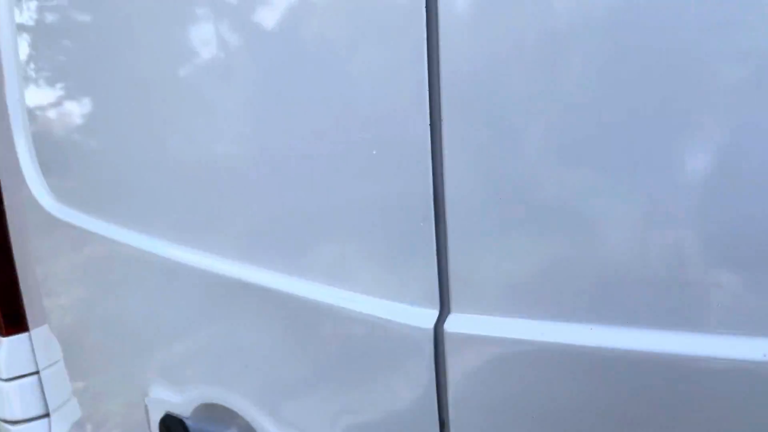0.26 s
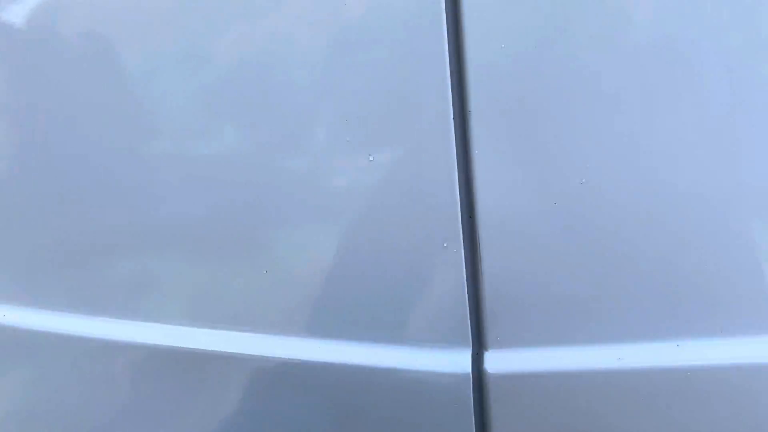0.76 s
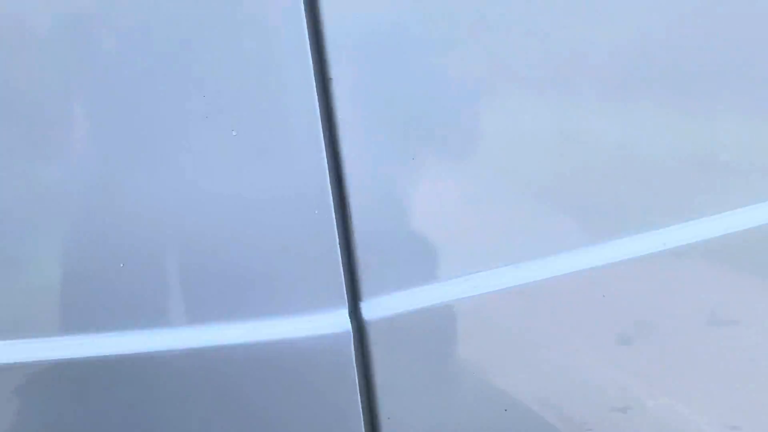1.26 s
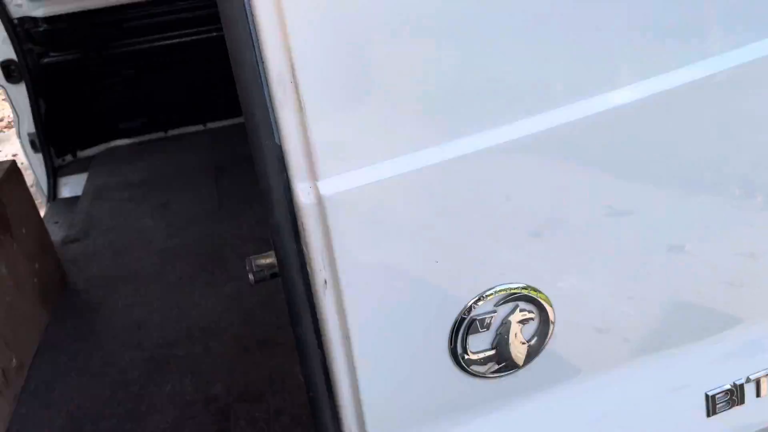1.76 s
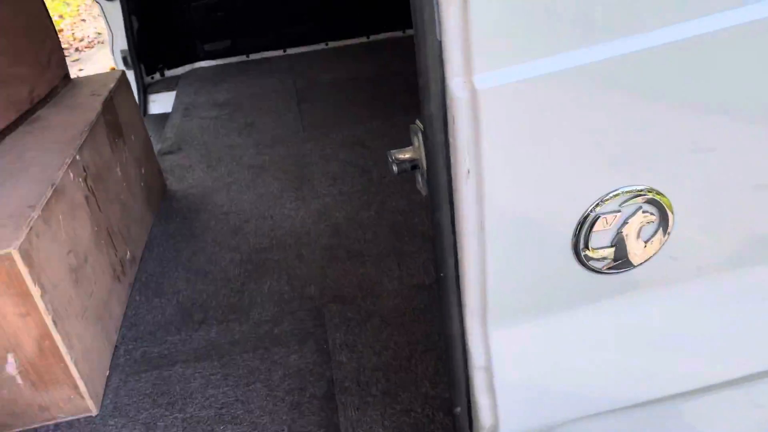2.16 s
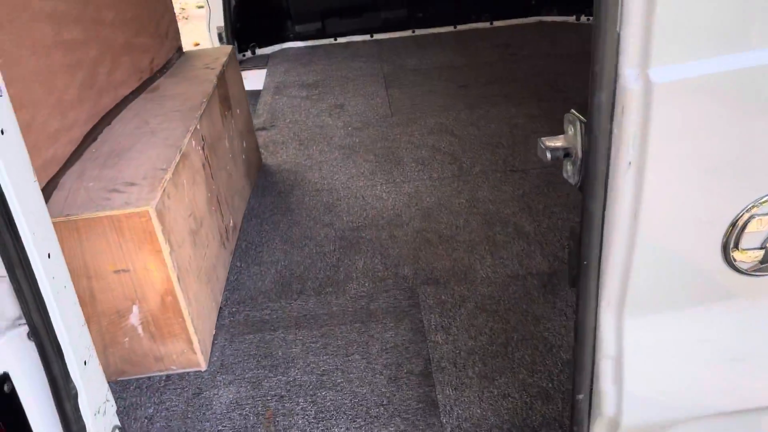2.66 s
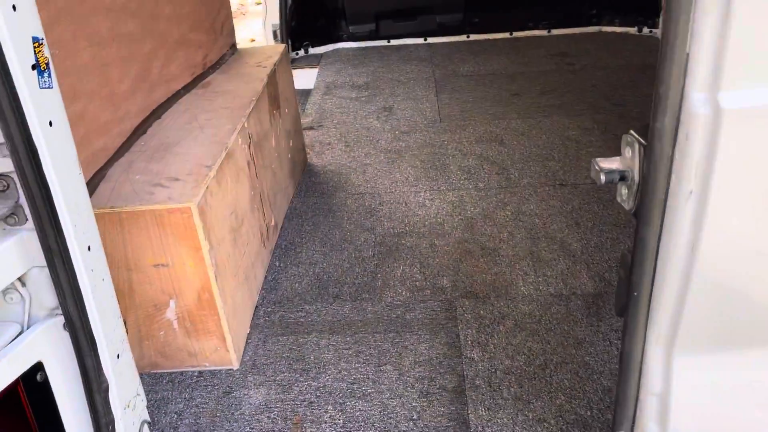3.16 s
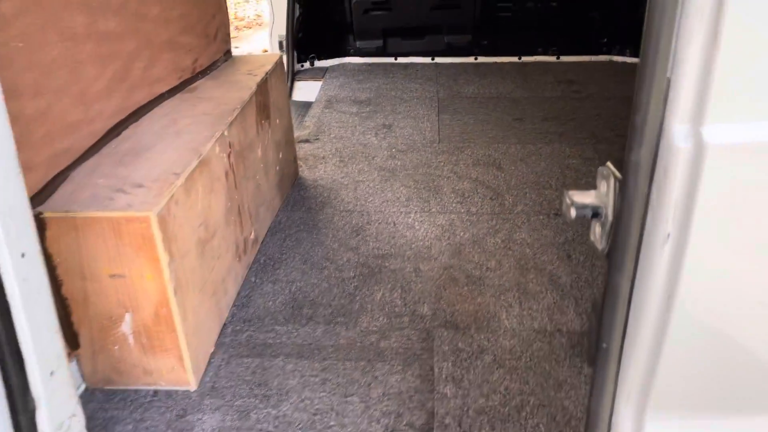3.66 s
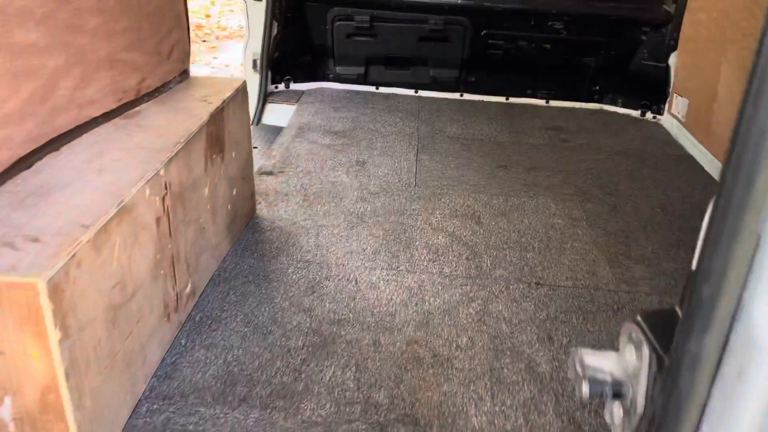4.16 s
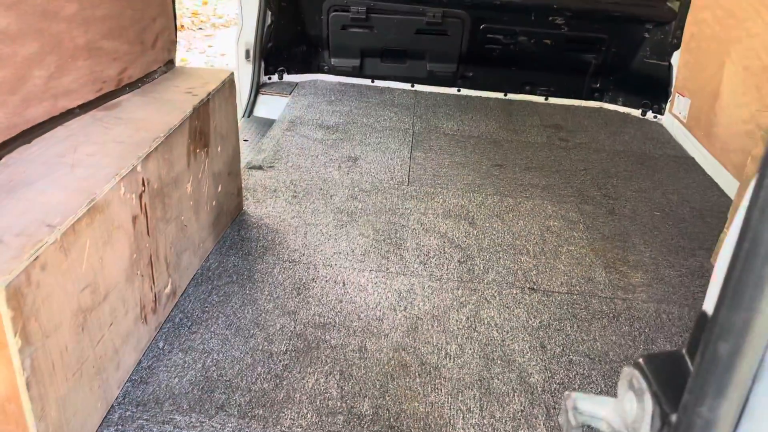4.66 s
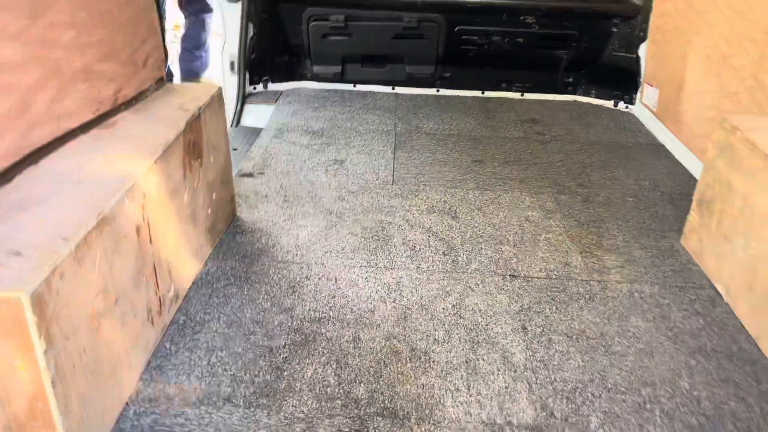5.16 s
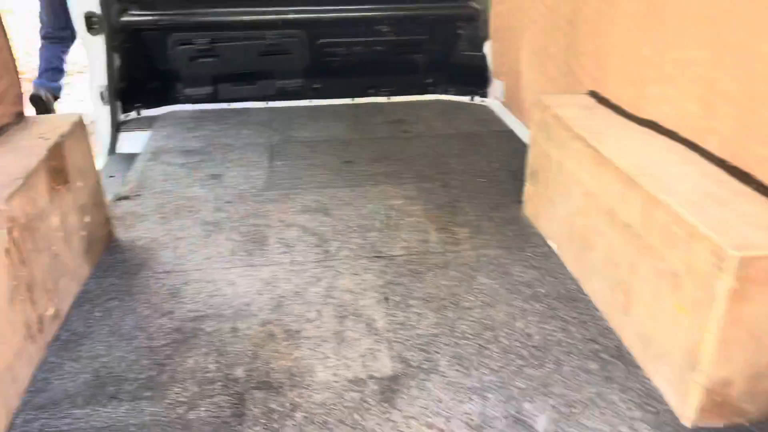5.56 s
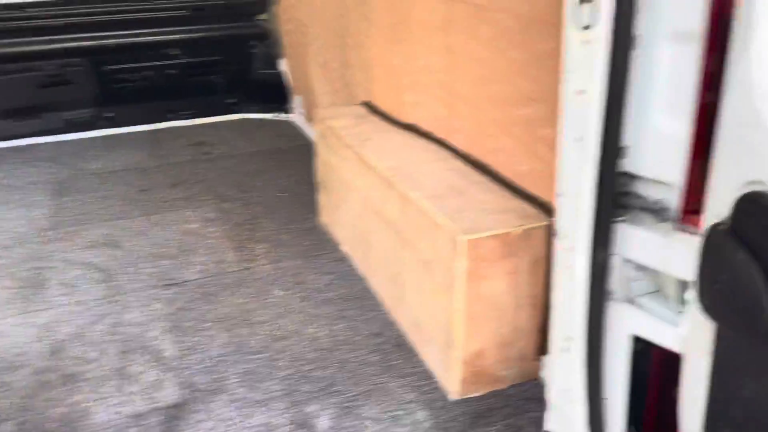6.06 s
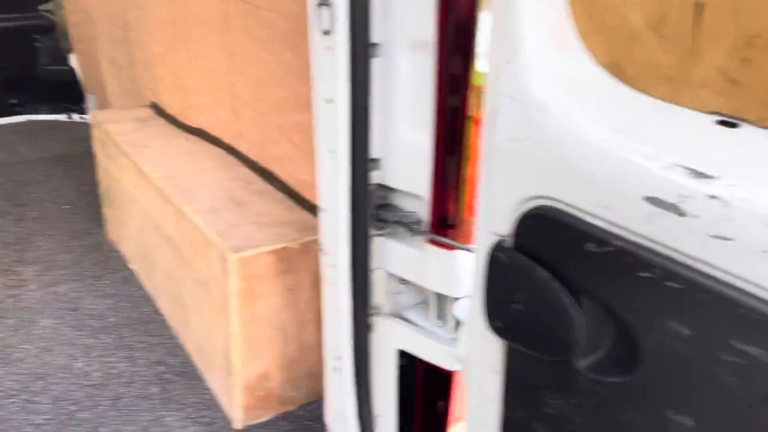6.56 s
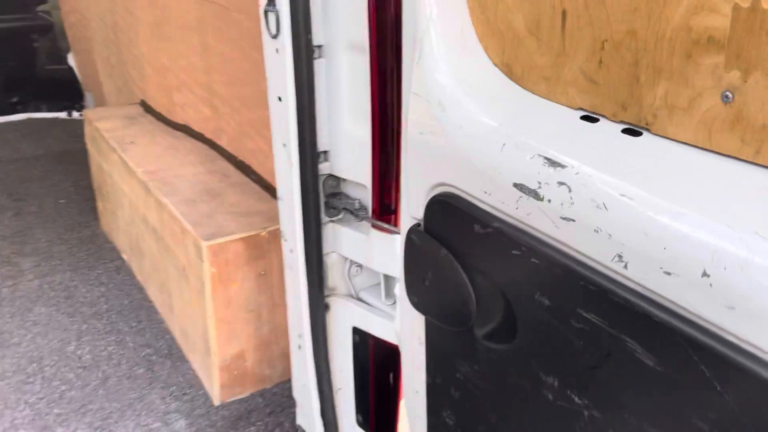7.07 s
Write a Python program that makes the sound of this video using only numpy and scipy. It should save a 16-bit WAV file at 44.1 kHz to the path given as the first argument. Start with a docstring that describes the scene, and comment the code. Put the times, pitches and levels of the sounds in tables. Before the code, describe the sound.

Outdoors, close to a phone microphone, a van's rear door is unlatched with a soft knock and a heavy clunk. Its hinges drag, making the metal panel rumble and hum until the door stay clacks. The second door then unlatches with a sharp metallic clack, swings with a quieter rumble and a brief scrape, and ends with more clunks. Faint rustling of clothes and grass and distant road traffic continue underneath.

```python
"""Outdoors, an arm's length from a phone: a van's two metal rear doors are unlatched and swung open in turn.
Latches and door stays clack and scrape; thumps boom in the sheet-metal panels. The hinges drag, and their
slips make the panels rumble and hum. Clothes and grass rustle nearby over distant road traffic."""
import sys
import numpy as np
from scipy import signal
from scipy.fft import rfft, irfft, next_fast_len
from scipy.io import wavfile
from scipy.ndimage import uniform_filter1d

SR = 44100
rng = np.random.default_rng(int(sys.argv[2]) if len(sys.argv) > 2 else 0)


def dump_mix(stems):
    """Bounce the given channels to the path in sys.argv[1] as a 16-bit WAV at rate SR."""
    frames = np.atleast_2d(stems).T  # one column per channel
    limited = np.clip(frames, -1, 1)  # hard clip at full scale
    pcm = np.round(limited * 32767).astype(np.int16)
    wavfile.write(sys.argv[1], SR, pcm)


N = 322856
T = np.arange(N) / SR

# panel modes: (pitch [Hz], width [Hz], struck [dB], first door turning [dB], second door turning [dB])
PANEL_MODES = [(37.6, 23, -10, -24, -19), (59.4, 8.3, -0.5, -4, -21), (73.9, 8.5, -3, -6, -12),
               (94.1, 23, -1, -1.5, 0), (114, 19.6, -9.5, 0.5, -4), (125.5, 27, -2, -0.5, -8),
               (157.1, 19.8, 4.5, 3, 4), (184.7, 15.2, -0.5, 1.5, 3), (213.9, 19, -1.5, -0.5, 0),
               (240.7, 13.1, -1.5, -2, -5), (270.8, 16.7, 5, -3, 2.5), (308.9, 15.6, -3, -7.5, -5.5),
               (359, 15.5, 1, -9, -19), (422.7, 32, 4.5, -14, -22), (490, 23, -7, -17, -27)]
# upper panel modes: (pitch [Hz], width [Hz], level [dB])
UPPER_MODES = [(453.4, 76, 12.5), (547, 95, 4), (647.5, 30, 3.5), (754, 110, 8), (891, 31, -3.5),
               (1100, 68, -13)]


def undb(db):
    return 10 ** (np.asarray(db) / 20)


def unit_rms(x):
    return x / np.sqrt(np.mean(x ** 2))


def over_time(table):
    """Columns of a (time [s], ...) table at every sample."""
    times_s, *columns = np.transpose(table)
    return [np.interp(T, times_s, column) for column in columns]


def on_log_hz(table, hz):
    """Columns of a (frequency [Hz], ...) table at hz."""
    knots_hz, *columns = np.transpose(table)
    return [np.interp(np.log(hz), np.log(knots_hz), column) for column in columns]


def band(x, hz, width_hz):
    """Resonance, unity gain at the centre."""
    return signal.lfilter(*signal.iirpeak(hz, hz / width_hz, SR), x)


def wobble(rate_hz):
    """Random steps, smoothed twice; rms 1."""
    hold = int(SR / rate_hz)
    steps = np.repeat(rng.standard_normal(N // hold + 1), hold)
    return unit_rms(uniform_filter1d(uniform_filter1d(steps, hold), hold)[:N])


def band_noise(hz, width_hz):
    """Steep noise band, rms 1; rows: direct, scattered."""
    return unit_rms(band(band(rng.standard_normal((2, N)), hz, width_hz), hz, width_hz))


def quadrature(tone):
    """Direct and scattered rows of a complex tone, a quarter cycle apart."""
    return np.array([tone.imag, tone.real])


def retune(hz, blow_hz, detune):
    """Parts sit differently at each blow: the nearest mode takes its pitch, the rest stray."""
    nearest = np.argmin(abs(np.log(hz / blow_hz)))
    return np.where(hz == hz[nearest], blow_hz, hz * (1 + detune))


def add(out, start_s, piece):
    start = int(start_s * SR)
    out[..., start:start + piece.shape[-1]] += piece[..., :N - start]


def wavering_noise(spectrum, flicker_db):
    """Half-octave bands, each wavering alone; rms 1."""
    low_hz, high_hz = spectrum[0][0], spectrum[-1][0]
    out = 0
    for hz in low_hz * 2 ** np.arange(0, np.log2(high_hz / low_hz), 0.5):
        density_db = on_log_hz(spectrum, hz)[0] + flicker_db * wobble(5)
        out += undb(density_db) * np.sqrt(hz) * band_noise(hz, 0.5 * hz)
    return unit_rms(out)


def traffic():
    """Distant road: engines rumble, tyres give a steadier roar near 1 kHz."""
    # (time [s], rumble [dB], roar [dB])
    levels = [(0.0, -36, -36.5), (1.14, -37, -40), (1.9, -35, -40), (3.79, -38.5, -40.5), (5.6, -36, -39.5),
              (7.32, -36.5, -38)]
    # spectra: (frequency [Hz], density [dB])
    engine_spectrum = [(25, -35), (40, -1), (62, 2), (100, -3), (160, -12), (260, -17.5), (420, -29)]
    tyre_spectrum = [(250, 2), (450, -7.5), (850, 7.5), (1300, 1), (2200, -3), (3300, -21), (5500, -38.5),
                     (9000, -58.5), (15000, -37)]
    rumble_db, roar_db = over_time(levels)
    roar = wavering_noise(tyre_spectrum, flicker_db=1.3)
    rumble = wavering_noise(engine_spectrum, flicker_db=2.4)
    return undb(rumble_db + 2.5) * rumble + undb(roar_db - 4.5) * roar


def rustle(rest_mid_db=-66.5, rest_treble_db=-78.0, flicker_db=2, grain_db=1.0):
    """Cloth and grass: grainy hiss, its bands flickering partly together; swishes rise out of it."""
    # (peak time [s], rise [s], fall [s], mid near 5 kHz [dB], treble near 11 kHz [dB])
    swishes = [(0.184, 0.15, 0.48, -62.5, -66), (0.82, 0.2, 0.36, -56, -60), (1.62, 0.2, 0.49, -52, -67),
               (2.11, 0.032, 0.24, -53.5, -80), (2.38, 0.16, 0.038, -54, -61), (2.62, 0.17, 0.41, -60, -81),
               (3.6, 0.14, 0.27, -71, -62.5), (3.73, 0.11, 0.089, -58, -63), (4.15, 0.14, 0.99, -73, -71.5),
               (4.62, 0.24, 0.12, -61, -58.5), (5.12, 0.15, 0.58, -64, -66.5),
               (5.44, 0.44, 0.066, -59, -71), (5.87, 0.17, 0.38, -49, -51.5), (5.95, 0.2, 0.21, -42.5, -48),
               (6.054, 0.55, 0.025, -43.5, -58), (6.17, 0.068, 0.62, -57, -84),
               (6.64, 0.26, 0.057, -55, -79), (7.04, 0.58, 0.94, -55, -71)]
    # (centre [Hz], level [dB], share that follows the treble [0-1])
    hiss_bands = [(1600, 0, 0), (2370, 1.5, 0), (3260, -3.5, 0.02), (4600, -1.5, 0.15), (6230, 0.5, 0.52),
                  (9400, 2.5, 0.93), (11200, -2.5, .99), (14500, -4.5, 0.86)]
    mid_db, treble_db = rest_mid_db, rest_treble_db
    for peak_s, rise_s, fall_s, peak_mid_db, peak_treble_db in swishes:
        times_s = [peak_s - rise_s, peak_s, peak_s + fall_s]
        mid_db = np.maximum(mid_db, np.interp(T, times_s, [rest_mid_db, peak_mid_db, rest_mid_db]))
        swish_treble_db = np.interp(T, times_s, [rest_treble_db, peak_treble_db, rest_treble_db])
        treble_db = np.maximum(treble_db, swish_treble_db)
    out, common_db = 0, grain_db * wobble(62)
    for hz, colour_db, treble_share in hiss_bands:
        db = mid_db + treble_share * (treble_db - mid_db) + colour_db
        out += undb(db + common_db + flicker_db * wobble(20)) * band_noise(hz, 0.5 * hz)
    return out


def panel_thumps(falloff_db_per_oct=16, nearest_db=5, rise_cycles=0.33):
    """Each blow rings the panel modes, most those near the pitch of the struck spot."""
    # (time [s], peak [dB], spot pitch [Hz], t60 of the nearest mode [s])
    blows = [(0.39, -14.5, 321, 0.12), (0.413, -15.5, 187.6, 0.21), (0.425, -13, 59.4, 0.54),
             (0.47, -21.5, 58, 0.29), (0.51, -17, 215.4, 0.17), (0.544, -20, 63, 0.14),
             (1.2357, -1, 333.7, 0.097), (1.236, -11, 68.4, 0.26), (1.239, -17, 247, 0.11),
             (1.243, -14.5, 42, 0.53), (1.246, 0.5, 172.5, 0.079), (1.264, -16.5, 161, 0.13),
             (1.297, -7.5, 164.5, 0.15), (1.326, -11, 210, 0.08), (1.65, -9, 270, 0.069),
             (1.702, -13, 237, 0.11), (2.16, -27.5, 579, 0.48), (2.16, -29, 494, 0.3),
             (1.69, -31, 650, 0.14), (2.191, -15, 206.5, 0.4), (2.524, -11, 184, 0.22),
             (2.671, -11.5, 330, 0.17), (2.674, -13, 94.7, 0.32), (2.677, -4, 237, 0.12),
             (2.749, -22, 137, 0.16), (4.083, -33, 666, 0.14), (4.161, -27.5, 71, 0.33),
             (4.203, -21, 55, 0.83), (4.207, -20, 301, 0.045), (4.264, -18, 199.6, 0.11),
             (4.371, -34.5, 220, 0.15), (4.709, -16, 392.5, 0.23), (4.714, -16.5, 91, 0.18),
             (4.734, -14, 78.8, 0.22), (4.737, -21.5, 260.5, 0.28), (4.769, -18, 89.8, 0.52),
             (4.752, -32, 634, 0.12), (5.106, -28, 67, 0.19), (5.934, -27.5, 643, 0.24),
             (6.454, -15, 362, 0.17), (6.467, -14, 268, 0.16), (6.475, -22.5, 635, 0.11),
             (6.483, -6.5, 328, 0.11), (6.49, -11, 98, 0.15), (6.503, -8, 270, 0.1),
             (6.508, -7.5, 175, 0.13), (6.515, -10, 119.6, 0.13), (6.5, -17, 43.8, 0.84),
             (6.539, -16.5, 280, 0.36), (6.599, -17.5, 283.4, 0.097)]
    modes = [mode[:3] for mode in PANEL_MODES]
    modes += [(hz, width_hz, db - 4) for hz, width_hz, db in UPPER_MODES[1:4]]
    hz, width_hz, mode_db = np.transpose(modes)[:, :, None]
    t, out = T[:SR // 2], np.zeros((2, N))
    draws = rng.uniform(-1.36, 1, (len(blows), 2, len(hz), 1))
    for (start_s, db, spot_hz, t60_s), (detune, phase) in zip(blows, draws):
        tuned_hz = retune(hz, spot_hz, 0.044 * detune)
        nearest = tuned_hz == spot_hz
        gain_db = np.where(nearest, nearest_db, mode_db - falloff_db_per_oct * abs(np.log2(tuned_hz / spot_hz)))
        damping = np.where(nearest, 1, np.sqrt(width_hz / 14))  # broad modes die sooner
        onset = 1 - np.exp(-t * hz / rise_cycles)
        envelope = onset * undb(gain_db - 60 * damping * t / max(t60_s, 0.02))
        ring = np.sum(envelope * np.exp(2j * np.pi * tuned_hz * t + 0.8j * phase), axis=0)
        add(out, start_s, undb(db) * quadrature(ring) / np.max(abs(ring.imag)))
    return out


def crack_and_rattle(blows, crack_t60_s=0.0081, crack_db=4, focus_db=5):
    """Noise of each blow: a short crack, then a rattling tail that dies sooner in the treble."""
    t, out = T[:SR // 3], 0
    for hz in 500 * 2 ** np.arange(0, 5.1, 0.5):
        envelope = np.zeros(N)
        for start_s, db, pitch_hz, body_db, treble_db, t60_s, rise_s in blows:
            spectrum = [(500, body_db - 3.5), (900, body_db), (3000, -9.5),
                        (6500, -6.5 + 0.28 * treble_db), (11000, treble_db), (16000, treble_db - 12)]
            colour_db, = on_log_hz(spectrum, hz)
            colour_db += focus_db * np.exp(-np.log2(hz / pitch_hz) ** 2 / 0.012)
            crack = undb(crack_db - 60 * t / (crack_t60_s + 6 * rise_s))
            tail_db = -3 - 0.0774 * db - 14 * (hz / 16000) ** 4  # soft blows: larger share of tail
            tail = undb(tail_db - 60 * t / t60_s * (hz / 3000) ** 0.38)
            onset = 1 - np.exp(-t / max(rise_s, 1 / hz))
            add(envelope, start_s, undb(db + colour_db) * onset * (crack + tail))
        out += envelope * band_noise(hz, min(0.63 * hz, 5000))
    return out


def steel_ring(blows, falloff_db_per_oct=18, nearest_db=5, scatter_db=3, damping=1.03):
    """Each blow lands elsewhere on the latch and rings its own mix of modes, most those near its pitch."""
    # (pitch [Hz], t60 [s], level [dB])
    latch_modes = [(1260, 0.093, 7), (1600, 0.056, 8), (1756, 0.025, 12), (2007, 0.036, 6),
                   (2417, 0.039, 7.5), (2734, 0.1, 0.5), (3050, 0.043, -2.5), (3205, 0.029, 6),
                   (3490, 0.06, 1), (3770, 0.034, 4), (4080, 0.034, 1), (4640, 0.023, 7.5),
                   (5320, 0.041, 0), (6200, 0.033, -7), (7250, 0.02, -12), (7200, 0.043, -9.5)]
    hz, mode_t60_s, mode_db = np.transpose(latch_modes)[:, :, None]
    t, out = T[:SR // 8], np.zeros((2, N))
    draws = rng.uniform(-0.94, 1, (len(blows), 3, len(hz), 1))
    for (start_s, db, pitch_hz, body_db, _, t60_s, rise_s), (size, detune, phase) in zip(blows, draws):
        tuned_hz = retune(hz, pitch_hz, 0.047 * detune)
        gain_db = mode_db + nearest_db * (tuned_hz == pitch_hz) + scatter_db * size
        gain_db -= falloff_db_per_oct * abs(np.log2(tuned_hz / pitch_hz))
        onset = 1 - np.exp(-t / rise_s)
        envelope = onset * undb(gain_db - 60 * damping * t / np.minimum(mode_t60_s, t60_s))
        ring = np.sum(envelope * np.exp(2j * np.pi * (tuned_hz * t + phase)), axis=0)
        ring_db = 1.3 * db + 0.0331 * body_db  # harder, fuller blows ring more
        add(out, start_s, undb(ring_db) * quadrature(ring) / np.max(abs(ring)))
    return out


def latches_and_stays(full_clack_rise_s=0.000089, scrape_rise_s=0.0082):
    """Latches and stays clack, weak blows rising more slowly; a stay scrapes over its catch."""
    # (time [s], level [dB], strongest pitch [Hz], body near 900 Hz [dB], treble [dB], t60 at 3 kHz [s])
    clacks = [(0.391, -51.5, 2030, 30, -25, 0.21), (0.8063, -29, 2110, -17, -6, 0.086),
              (0.834, -34, 1510, -6, -3, 0.067), (1.087, -36, 5100, -20, -4, 0.013),
              (1.2303, -31, 4660, -17, -12, 0.025), (1.2346, -16.5, 1910, 4, -6.5, 0.05),
              (1.239, -27, 1250, 11, -5, 0.25), (1.288, -34, 2400, -16, -17, 0.7),
              (1.541, -34, 2690, 2, -30, 0.77), (1.702, -26.5, 2020, -11, -24, 0.18),
              (1.786, -19.5, 2144, -12.5, -13, 0.37), (2.106, -30, 2370, 3, -22, 0.12),
              (2.3016, -24.5, 2610, 3, -5, 0.17), (2.524, -36, 2280, 7.5, -13, 0.58),
              (2.549, -32.5, 2480, -15, -9, 0.3), (2.622, -19.5, 3200, 0, 2.5, 0.11),
              (2.661, -10.5, 2390, -9.5, -9, 0.23), (2.663, -16, 5400, -22, -6, 0.062),
              (2.663, -11, 3830, -20, -27, 0.07), (2.666, -18, 1270, 14, -32, 0.078),
              (2.9384, -35.5, 3010, 10.5, -45, 0.041), (3.2939, -24.5, 2730, -15, -30, 0.18),
              (3.734, -28.5, 3450, -28, -9, 0.097), (4.0835, -40.5, 2160, 13, -2, 0.26),
              (4.264, -41, 2860, -22, -5, 0.89), (4.329, -41, 2200, -13, -12, 0.11),
              (4.617, -31, 2610, 0.5, -5, 0.48), (4.692, -14.5, 1960, 2.5, -27, 0.14),
              (4.708, -26, 4740, -28, 7, 0.05), (4.7091, -9.5, 2100, -10, -3.5, 0.2),
              (4.7118, -6, 1637, -3, -42, 0.13), (4.712, -17, 3100, -10.5, -21, 0.091),
              (4.7275, -9.5, 1980, -11, -37, 0.15), (4.739, -14, 1600, -12, -32, 0.17),
              (4.742, -19, 3240, -19, -37, 0.36), (4.801, -33.5, 2480, -36, 2, 0.33),
              (5.322, -37, 2460, 9.5, -37, 0.18), (5.378, -42, 6000, -18, 5, 0.15),
              (5.436, -30, 5140, -2, -5, 0.22), (5.893, -24, 4650, -30, -35, 0.1),
              (5.894, -21, 2620, -30, -36, 0.11), (6.451, -14, 3395, -16, -5, 0.077),
              (6.452, -22.5, 2770, 0, -7, 0.37), (6.473, -25, 2700, 7.5, -31, 0.19),
              (6.4862, -28.5, 1270, 6.5, -29, 0.17), (6.503, -45, 2360, -8, -28, 0.16),
              (6.5186, -35, 4760, -17, -4, 0.65), (6.612, -37, 4800, -11, -14, 0.081),
              (7.0096, -31, 2620, -16, -18, 0.25)]
    scrapes = [(2.7498, -27, 4760, -13, -22, 0.12), (2.751, -25, 2430, -17, -22, 0.18),
               (5.886, -24, 3585, -4.5, -44, 0.5), (5.929, -33, 2380, -2.5, -30, 0.42),
               (6.011, -27.5, 2740, -3, -33, 0.2)]
    blows = [(*row, full_clack_rise_s * undb(-0.44 * row[1])) for row in clacks]
    blows += [(*row, scrape_rise_s) for row in scrapes]
    return undb(-12.5) * crack_and_rattle(blows) + undb(2.5) * steel_ring(blows)


def hinge_drag(slips_per_s=700, scatter_db=2.5, waver_db=2.5, second_door_s=4):
    """Uneven slips in hinges and stays shake the panels; each mode swells and sinks as a door turns."""
    # per door: (time [s], modes under 170 Hz [dB], modes above [dB], upper modes relative to those [dB])
    swings = [
        [(0.6, -38.5, -46.5, 6.5), (0.928, -28.5, -28.5, -40), (1.2, -35, -32.5, -5.5), (1.36, -27.5, -27, -29),
         (1.55, -26.5, -22, -11), (1.72, -28, -21, -8.5), (1.84, -25, -21, -14.5), (2.06, -27.5, -27, -11),
         (2.28, -30.5, -31, -7.5), (2.46, -29, -29, -15.5), (2.64, -25.5, -24, -8), (3.25, -45.5, -47, -3)],
        [(4.96, -60, -80, -15), (5.2, -38.5, -38, -9), (5.31, -35.5, -35.5, -15.5), (5.67, -35, -34, -8),
         (5.95, -33, -34.5, -22), (6.36, -48, -55, 5.5), (6.62, -26, -28.5, -15), (6.74, -36.5, -43, -3),
         (6.9, -66, -44.5, -6.5)],
    ]
    chance, size, direction = rng.random((3, 2, N))
    slips = (chance < slips_per_s / SR) * undb(-scatter_db * np.log(size + 1e-9))
    slips *= np.sign(direction - 0.5)
    low_db, high_db, upper_db = over_time(swings[0] + swings[1])
    moving, rumble, upper = 0, 0, 0
    for swing in swings:
        start_s, end_s = swing[0][0], swing[-1][0]
        moving += np.interp(T, [start_s - 0.05, start_s, end_s, end_s + 0.11], [0, 1, 1, 0])
    for hz, width_hz, _, first_db, second_db in PANEL_MODES:
        db = np.where(T < second_door_s, first_db, second_db) + (low_db if hz < 170 else high_db)
        mode = unit_rms(band(band(slips, hz, 0.73 * width_hz), hz, 4 * width_hz))
        rumble += undb(db - 5 + waver_db * wobble(6)) * mode
    for hz, width_hz, db in UPPER_MODES:
        mode = unit_rms(band(band(slips, hz, width_hz), hz, 2 * width_hz))
        upper += undb(db + waver_db * wobble(13)) * mode
    return moving * (rumble + undb(high_db + upper_db) * unit_rms(upper))


def panel_hums(pitch_wander=0.0118, waver_db=0.5):
    """Hinge slips lock briefly onto one panel mode, which hums on a slightly wandering pitch."""
    # (time [s], length [s], pitch [Hz], level [dB])
    hums = [(1.3, 0.42, 111, -28.5), (2, 0.14, 220, -30), (1.4, 0.16, 222, -31.5), (1.566, 0.22, 320, -28),
            (1.4, 0.16, 130, -25), (1.74, 0.13, 115, -22), (1.88, 0.081, 132, -28),
            (1.95, 0.34, 214, -27.5), (5.2, 0.23, 140, -31), (5.37, 0.21, 278, -36.5),
            (4.8, 0.17, 282, -42), (5.5, 0.245, 300, -38)]
    warped_s = np.cumsum(1 + pitch_wander * wobble(15)) / SR
    waver = undb(waver_db * wobble(18))
    out = np.zeros((2, N))
    for (start_s, length_s, hz, db), phase in zip(hums, rng.random(len(hums))):
        progress = np.clip((T - start_s) / length_s, 0, 1)
        swell = np.sqrt(np.sin(np.pi * progress).clip(0))
        tone = np.exp(2j * np.pi * (hz * warped_s + phase))
        out += undb(db + 2) * swell * waver * quadrature(tone)
    return out


def mic_ports(sound):
    """Two ports share the direct sound, offset in phase and level; scattered sound sets them apart."""
    # (frequency [Hz], left minus right [dB], likeness [0-1], left lead [rad])
    response = [(30, 1.6, .97, 0), (150, 3.8, .96, 0), (300, 4.4, .9, 0), (600, 3, .6, 0), (1100, 1, .4, 0),
                (1700, .5, .3, 0), (2400, 2, .65, 0), (4400, 4.8, .72, .4), (5900, 3.5, .75, 0),
                (7000, 1, .8, -1.6), (7800, 0, .98, -3), (9000, 0, .98, -3.3), (10700, 0, .98, -6.1),
                (12500, 0, .98, -6.4), (14000, 0, .98, -9.3), (17000, 0, .98, -9.5)]
    size = next_fast_len(N + SR // 10)
    bins_hz = np.maximum(np.arange(size // 2 + 1) * SR / size, 1)
    pan_db, likeness, lead_rad = on_log_hz(response, bins_hz)
    direct, scattered = rfft(sound, size)
    side = np.array([[1], [-1]])
    mix = np.sqrt((1 + likeness) / 2) * direct + side * np.sqrt((1 - likeness) / 2) * scattered
    return irfft(mix * undb(side * pan_db / 2) * np.exp(0.5j * side * lead_rad), size)[:, :N]


def scene():
    """Doors, rustle and traffic at the two ports."""
    # door position as the phone turns: (time [s], left minus right [dB])
    door_pan = [(0.4, 0), (1.2, 0.5), (2.7, 1.5), (4.2, 0), (4.7, 0), (5.5, 0), (6.5, -1)]
    pan_db, = over_time(door_pan)
    doors = mic_ports(latches_and_stays() + panel_thumps() + hinge_drag() + panel_hums())
    return doors * undb(np.array([pan_db, -pan_db]) / 2) + mic_ports(rustle() + traffic())


def record(dry):
    """The phone drops the deepest bass, rounds the loudest peaks and cuts the top."""
    low_cut_hz, top_hz = 28, 16300
    x = signal.sosfilt(signal.butter(2, low_cut_hz, "high", fs=SR, output="sos"), dry)
    rounded = np.tanh(0.9 * x) / 0.9
    return signal.sosfilt(signal.ellip(12, 0.2, 90, top_hz, fs=SR, output="sos"), rounded)


dry = scene()
out = record(dry)
dump_mix(out)
```